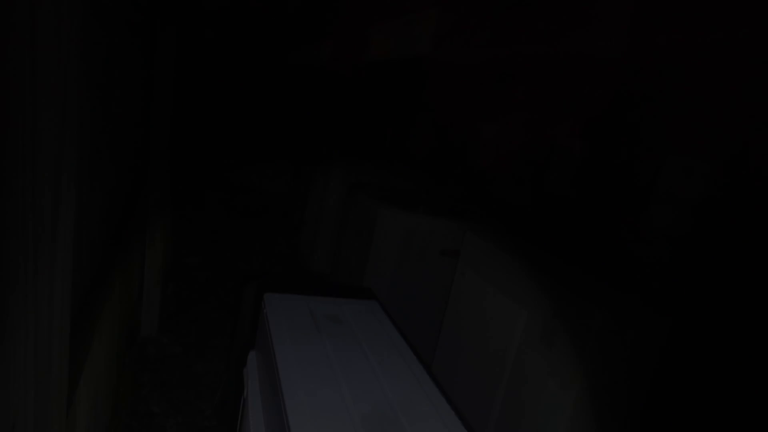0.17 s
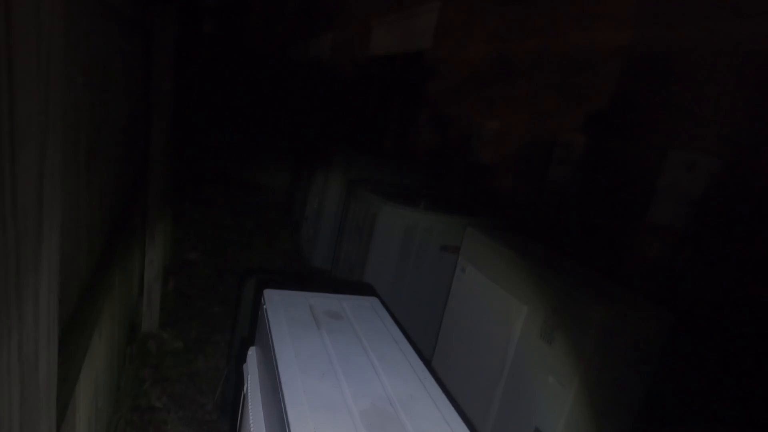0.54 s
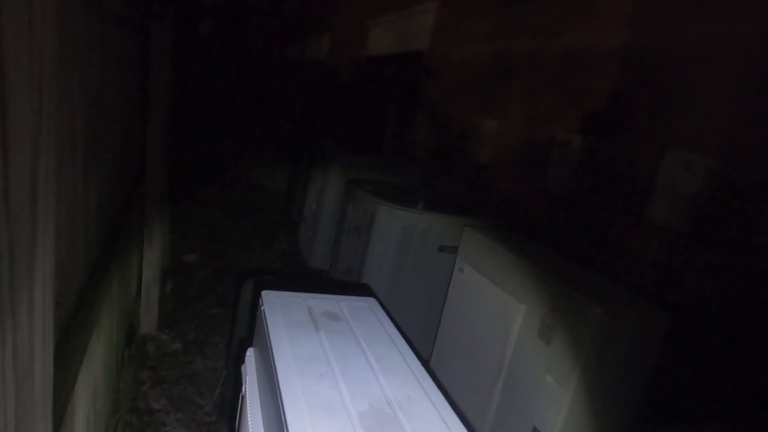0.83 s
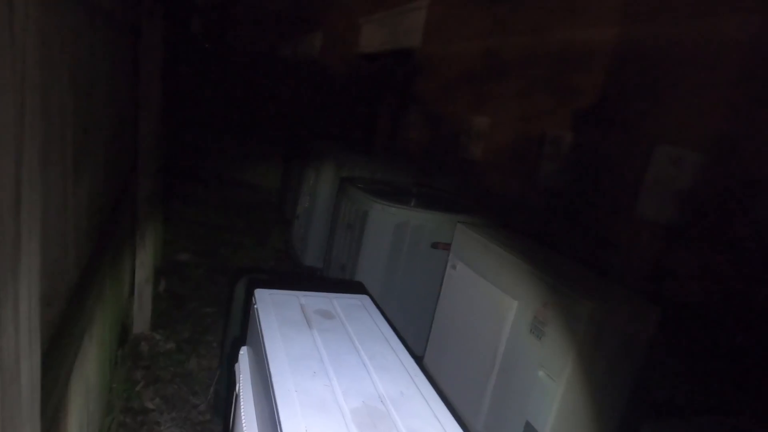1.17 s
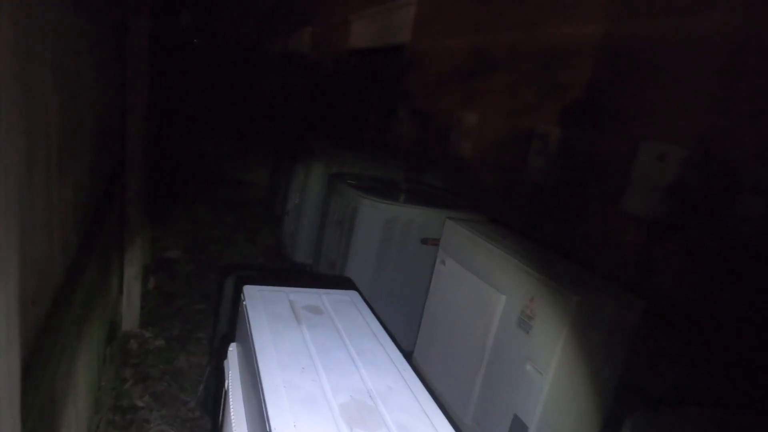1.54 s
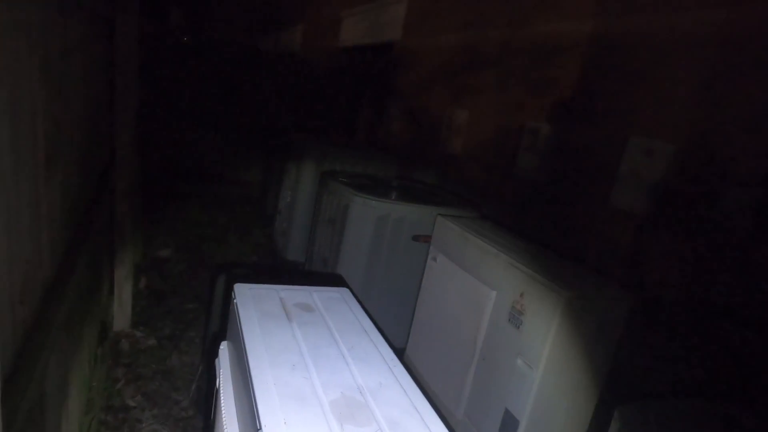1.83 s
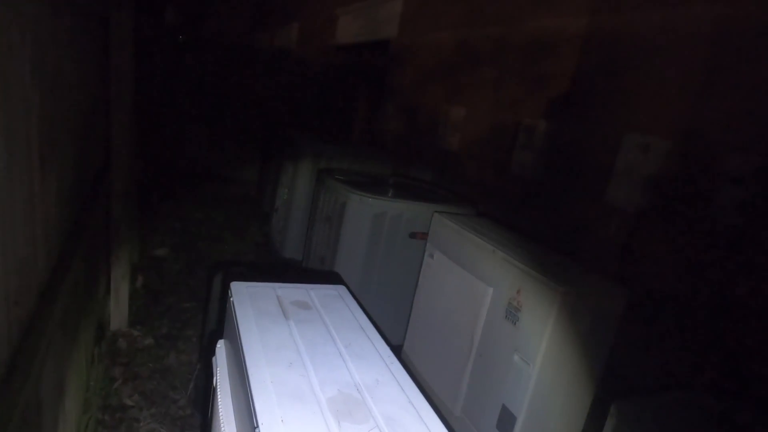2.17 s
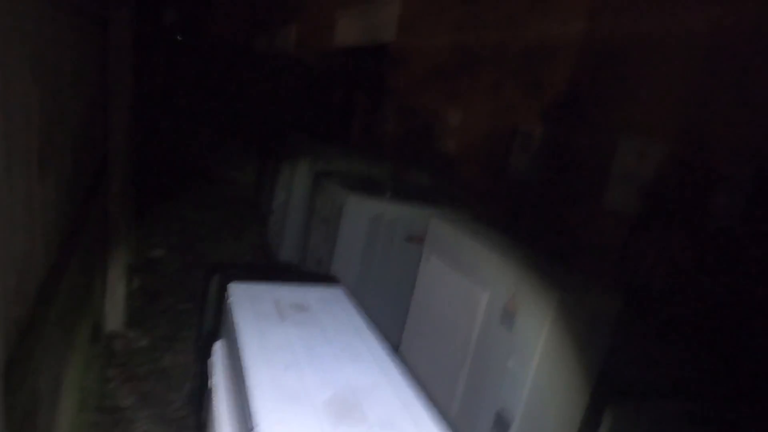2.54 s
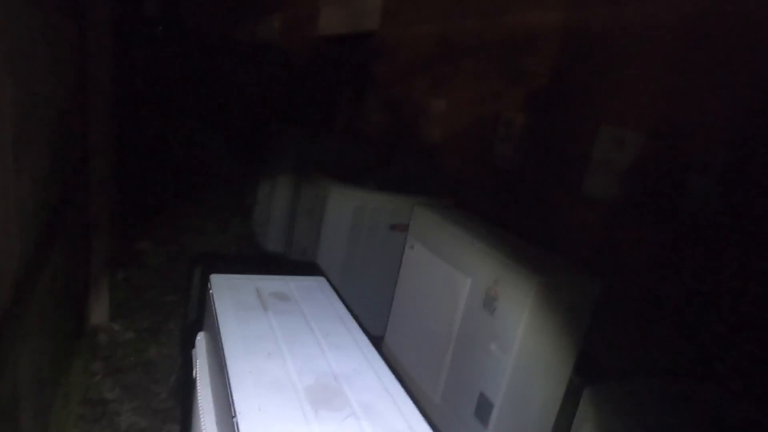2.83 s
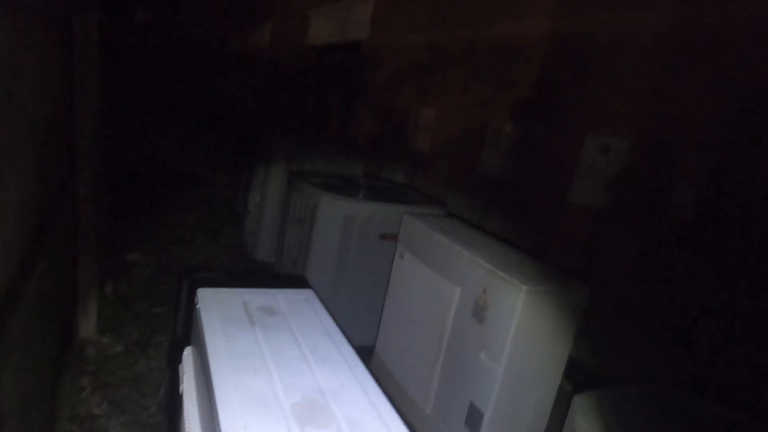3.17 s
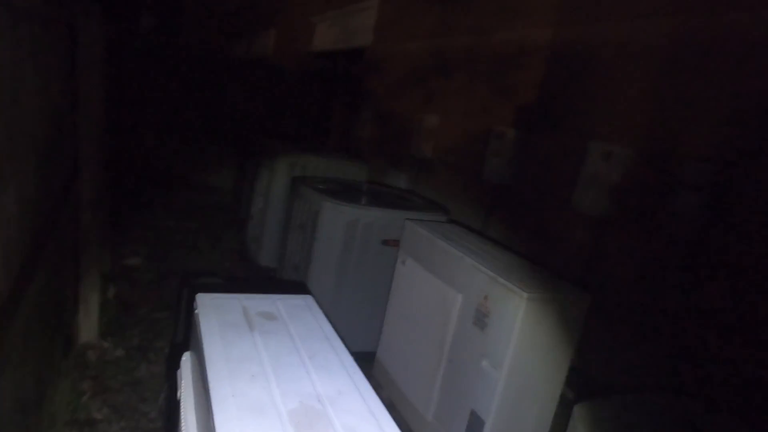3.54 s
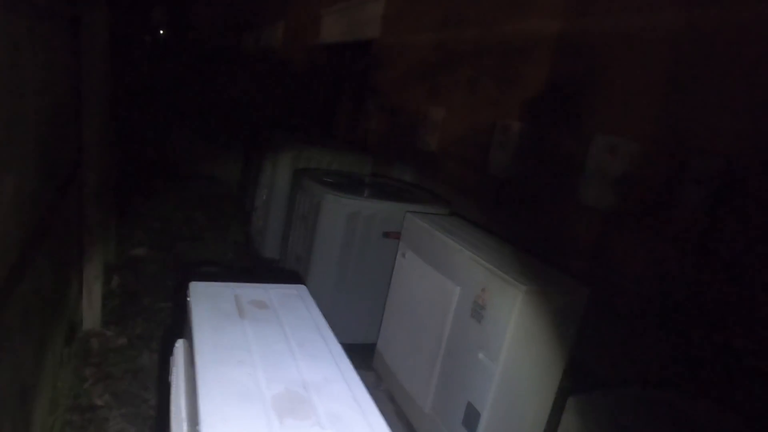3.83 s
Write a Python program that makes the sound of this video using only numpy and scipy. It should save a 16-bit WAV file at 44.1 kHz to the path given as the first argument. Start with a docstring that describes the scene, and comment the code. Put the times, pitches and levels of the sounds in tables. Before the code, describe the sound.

Air conditioning unit hums with rushing air at night until a neighbouring unit starts with a metallic clunk.

```python
"""Air conditioners at night

Outdoor units in a narrow side yard, fading in. A running unit drones: fan blade tones and compressor
whine throb about ten times a second, over rushing air (shaped noise) and a hum of two beating tones.
Soft low bumps and metal ticks are short bursts. At 2.3 s a second unit clunks on: noise clatter and
panel modes ring, low booms shudder on its mounts, and its compressor spins up and settles to a fine
buzz, made of a noise pattern repeated every turn."""
import sys
import numpy as np
from scipy import signal
from scipy.fft import rfft, irfft
from scipy.io import wavfile
from scipy.ndimage import uniform_filter1d

SR = 44100
rng = np.random.default_rng(int(sys.argv[2]) if len(sys.argv) > 2 else 0)


def transcribe(u):
    """Save the signal u as a 16-bit wav file named by the first command-line argument.

    u: samples, shape (n,) or (channels, n), limited to [-1, 1]; the rate is SR.
    q: integer samples, one column per channel.
    """
    v = np.clip(np.atleast_2d(u).T, -1, 1)
    q = np.round(v * 32767).astype(np.int16)
    wavfile.write(sys.argv[1], SR, q)


N = 176400

# Stereo noise: (frequency [Hz], left-right likeness [0-1])
LIKENESS = [(25, 0.55), (60, 1), (100, 0.96), (140, 1), (200, 1), (290, 1), (430, 0.95), (640, 0.6),
            (1100, 0.44), (1500, 0.43), (2000, 0.78), (3300, 0.63), (5000, .5), (7000, 0.38), (15000, .1)]
# (frequency [Hz], left over right [dB])
PAN = [(60, -2), (120, 0), (260, 0), (480, -2), (680, -13.5), (1000, -9.5), (1900, -5.5), (3800, -4),
       (7500, -3.5), (15000, 5)]
# (frequency [Hz], left lead [rad])
LEAD = [(100, 0.5), (350, -0.5), (540, -2), (700, 0), (1120, 1), (2000, 0.84), (2900, 0.33), (4300, -0.4),
        (6200, -1.85), (10000, -3.5)]

# Running unit
BLADE_HZ, PUMP_HZ, THROB_HZ = 42.78, 26.587, 9.92
THROB_AT_S, THROB_SHARP = 0.005, 0.1
PUMP_THROB, AIR_THROB, STROKE_DEPTH = 0.3, 0.38, 0.3
# Fan tones: (multiple of blade rate, base level [dB], left over right [dB], left lead [rad],
# throb depth, pitch sway [rad])
FAN_TONES = [(2, -49.5, 0, -0.26, .1, 0), (3, -50.5, -2, -0.087, .1, 0), (10, -56, -4.5, -0.57, .2, 0),
             (11, -54, -2.5, 0.59, .3, -.1), (12, -40.5, -2, -0.72, .56, -.35),
             (13, -35.4, -3.5, -0.81, .48, .14), (14, -47.5, -13, -0.96, .9, -.1),
             (15, -50.5, -8, -0.76, 1.1, -.7), (24, -51, -5.5, 0.8, .7, 0)]
# Sway of the hand-held microphone from the fan: (time [s], extra distance [m])
MIC_SWAY = [(0, -0.14), (1.5, -0.087), (1.75, 0.043), (2.05, -0.085), (2.4, -0.013), (2.85, -0.11),
            (3.1, -0.00055), (3.33, -0.045), (3.55, 0.19), (4, .15)]
SOUND_M_PER_S, FAN_WAVER_DB = 343, 0.7
# Compressor whine: (multiple of pump speed, base level [dB], left over right [dB], left lead [rad])
PUMP_TONES = [(5, -54.5, -0.5, -0.16), (24, -48, -3, -0.046), (25, -41.5, -5.5, 0.79),
              (26, -43.5, -12.5, -0.57), (27, -52, -10, -0.15), (28, -57, -6, 0.23), (31, -57, 5, 0.089),
              (44, -55, -8.5, 0.54)]
# Casing resonances stirred by air: (frequency [Hz], width [Hz], base level [dB])
CASING_MODES = [(575, 45, -43), (686, 49, -39.5)]
# Gain of whine and casing: (time [s], level [dB])
DRONE_LEVEL = [(.8, -1), (2, -2), (3.1, 0), (3.4, -1), (3.7, 1.5)]

HUM_HZ, BEAT_HZ, BEAT_AT_S, BEAT_DEPTH = 59.9, 2.86, 1.738, 0.85
# Hum level before beating: (time [s], level [dB])
HUM_LEVEL = [(0, -38), (1.2, -48.5), (1.7, -41), (2.1, -41.5), (2.45, -44.5), (2.8, -41), (3.15, -48.5),
             (3.5, -42), (4, -46)]

# Rushing air spectrum: (frequency [Hz], relative density [dB per Hz])
AIR_SPECTRUM = [(20, -13), (45, -7), (65, -4), (100, -2), (135, -3.5), (170, -1.5), (240, -4), (330, -10.5),
                (480, -6), (780, -9), (1000, -5.5), (1170, -4), (1350, -14), (1800, -13.5), (2150, -23),
                (3600, -26.5), (4100, -30), (5200, -30.5), (7000, -35.5), (9500, -41), (11500, -59.5),
                (15000, -66)]
# Grille resonances: (frequency [Hz], level [dB])
GRILLE_MODES = [(1464, -55), (1723, -59.5), (1976, -60.5), (2762, -67), (2880, -69.5), (2945, -70),
                (3801, -72.5), (3946, -76.5)]
# Deep rumble: (time [s], level [dB])
RUMBLE_LEVEL = [(0, -59), (2.599, -58.5), (2.82, -41), (3.05, -58), (3.33, -47), (3.5, -32), (3.66, -53),
                (3.85, -36), (4, -54)]
# Deep rumble: (frequency [Hz], left-right likeness [0-1])
RUMBLE_LIKENESS = [(20, .2), (200, .3)]
# Whistle swell: (time [s], gain [dB])
WHISTLE_SWELL = [(0.2, 1), (0.55, 7), (0.9, 5), (1.4, -0.5), (2.3, 0), (2.8, 3)]
AIR_DB, BUFFET_DB, WHISTLE_DB = -33.5, -52.5, -64.5
GRILLE_WIDTH_HZ, WHISTLE_HZ, WHISTLE_WIDTH_HZ = 22, 3487, 75

# Low bumps: (centre time [s], frequency [Hz], peak level [dB])
LOW_BUMPS = [(.82, 123.7, -34), (1.15, 107, -34), (1.385, 62, -34), (2.14, 88, -34), (2.67, 86.3, -36),
             (2.95, 78.7, -35), (3.82, 90, -32.5)]
BUMP_S = 0.026  # centre to 1/e
# Casing ticks: (time [s], frequency [Hz], level [dB])
CASING_TICKS = [(1.008, 3520, -44), (2.637, 5000, -46), (2.692, 4900, -42.5), (3.228, 3400, -45)]

# Clunk blows: (time [s], relative level [dB], treble tilt [dB per octave])
CLUNK_BLOWS = [(2.320, -17, 1.5), (2.3402, -4, 4), (2.3438, -1, 4), (2.349, -2, 1), (2.360, -1.5, -6),
               (2.365, -2.5, -6.5), (2.375, -8.5, 0), (2.384, -11.5, -2)]
# Cabinet clatter: (frequency [Hz], relative density [dB per Hz], t60 [s])
CLATTER_BANDS = [(150, -15, 0.33), (500, -2.5, 0.18), (960, 5, 0.16), (1380, 2.5, 0.22), (2200, -4.5, 0.22),
                 (3430, -2, 0.18), (4600, -9, 0.19), (5800, -1.5, 0.071), (7570, -19.5, 0.29),
                 (9800, -23, 0.18), (11900, -40, 0.24), (15500, -44, .15)]
# Sheet metal modes: (frequency [Hz], relative level [dB], t60 [s])
PANEL_MODES = [(920, 5, 0.12), (1054, 7, 0.22), (1285, 6, 0.18), (2369, -1, 0.16), (2910, 2, .13),
               (3800, 2, 0.11), (5300, -2, .1)]
# Clunk stereo: (frequency [Hz], left-right likeness [0-1])
CLUNK_LIKENESS = [(150, 1), (400, 0.73), (950, 0.61), (2400, 0.69), (6000, 0.45), (15000, .1)]
# (frequency [Hz], left over right [dB])
CLUNK_PAN = [(60, 3), (150, 2), (380, 2), (950, -4.5), (2380, -1), (5980, -1), (15000, 1)]
# (frequency [Hz], left lead [rad])
CLUNK_LEADS = [(100, 0), (6400, 0), (9000, -1.6)]
CLATTER_DB, PANEL_DB, BLOW_RISE_S = -24.8, -41.5, 0.001
CRACK_DB, CRACK_S = -10, 0.009  # extra edge, relative to the clatter
CHATTER_DB, CHATTER_HZ = 2.2, 260

# Starting compressor; MOTOR_HZ is its settled speed
START_S, MOTOR_HZ, SPIN_UP_S = 2.345, 59.04, 0.05
# Strong partials: (multiple of motor speed, base level [dB], left over right [dB], left lead [rad])
MOTOR_TONES = [(2, -57.5, -2.5, 0), (3, -45.5, -0.5, 0), (4, -50, 1, 0.067), (5, -50.5, 0.5, 0.13),
               (7, -48.5, -3, 0), (16, -53.5, -2, 0.55), (25, -57, -2, 0.21), (26, -49, -4, 0.66),
               (29, -60, -3, 0.24), (30, -59.5, -7, .3), (51, -61, 1, .3)]
# Buzz spectrum: (frequency [Hz], relative density [dB per Hz])
BUZZ_SPECTRUM = [(900, -9.5), (1700, 7), (2100, -4.5), (3000, -0.5), (3900, -8), (4700, -7), (5700, -10),
                 (6400, -8), (8000, -15), (9800, -21), (11500, -50), (15000, -42)]
BUZZ_DB, STRAIN_DB, SETTLE_S, EASE_DB_PER_S = -46, 7.5, 0.22, 2
BUZZ_ROUGH = 0.08  # power share of plain noise

# Heave of the cabinet as the motor takes load
HEAVE_HZ, HEAVE_WIDTH_HZ, HEAVE_DB, HEAVE_RISE_S, HEAVE_S = 210, 210, -31, 0.03, 0.26
# Shudders on the mounts: (time [s], frequency [Hz], level [dB], t60 [s])
MOUNT_SHUDDERS = [(2.352, 182, -23, 0.2), (2.458, 153, -24, .2), (2.48, 248, -30, 0.6),
                  (2.55, 200, -34, .4), (2.72, 177, -28, 0.42)]

EDGE_HZ = 15300


def amp(db):
    """Decibels to gain."""
    return 10 ** (np.asarray(db) / 20)


def unit(x):
    """Scales to rms 1."""
    return x / np.sqrt(np.mean(x ** 2) + 1e-20)


def clock():
    """Time of every sample [s]."""
    return np.arange(N) / SR


def bins():
    """Frequency of every bin [Hz]."""
    return np.fft.rfftfreq(N, 1 / SR)


def read(points, hz, column=1):
    """Interpolates a table on a log-frequency axis."""
    rows = np.array(points)
    return np.interp(np.log(hz + 1), np.log(rows[:, 0]), rows[:, column])


def contour(points):
    """Interpolates a (time, value) table at every sample."""
    return np.interp(clock(), *np.transpose(points))


def add(mix, start_s, sound):
    """Mixes a sound in at a time, cut at the end."""
    part = mix[:, round(start_s * SR):][:, :sound.shape[-1]]
    part += sound[..., :part.shape[1]]


def decay(t, t60_s):
    """Exponential fall of 60 dB in t60."""
    return np.exp(-np.log(1000) * t / t60_s)


def drift(hz):
    """Slowed noise of rms 1; higher hz wanders faster."""
    return unit(irfft(rfft(rng.standard_normal(N)) / (1 + (bins() / hz) ** 2), N))


def noise(gain, likeness=LIKENESS, pan=PAN, lead=LEAD):
    """Coloured stereo noise of rms 1 with likeness, level and phase set between two ports."""
    hz = bins()
    left, other = rfft(rng.standard_normal((2, N)))
    same = np.clip(read(likeness, hz), 0, 1)
    side = amp(read(pan, hz) / 2)
    right = same * left + np.sqrt(1 - same ** 2) * other
    right = right * np.exp(-1j * read(lead, hz))
    return unit(irfft(np.array([left * side, right / side]) * gain, N))


def peak(hz, width_hz):
    """Resonance gain, half amplitude at half the width from centre."""
    return 1 / (1 + (2 * (bins() - hz) / width_hz) ** 2)


def throb(depth):
    """Regular swelling of the drone: round crests, narrow dips."""
    angle = 2 * np.pi * THROB_HZ * (clock() - THROB_AT_S)
    return 1 + depth * (np.cos(angle) - THROB_SHARP * np.cos(2 * angle))


def ports(z, db, pan_db, lead_rad):
    """A complex tone as two microphone ports hear it."""
    left = amp(pan_db / 2) * (z * np.exp(1j * lead_rad)).real
    right = amp(-pan_db / 2) * z.real
    return np.sqrt(2) * amp(db) * np.array([left, right])


def partials(rows, turns, waver, waver_hz, scatter_turns):
    """Wavering multiples of a rotation: in step they join into pulses; scatter loosens them."""
    out = np.zeros((2, N))
    for k, db, pan_db, lead_rad in rows:
        z = np.exp(2j * np.pi * (k * turns + scatter_turns * rng.random()))
        wander = 1 + waver * (drift(waver_hz) + 1j * drift(waver_hz))
        out += ports(z * wander, db, pan_db, lead_rad)
    return out


def fan():
    """Blade tones swell and bend with each throb; odd multiples sit a quarter cycle ahead."""
    t, out = clock(), np.zeros((2, N))
    distance_m = uniform_filter1d(contour(MIC_SWAY), size=4410)  # 0.1 s smoothing
    turns = BLADE_HZ * (t - distance_m / SOUND_M_PER_S)
    bend = np.sin(2 * np.pi * THROB_HZ * (t - THROB_AT_S))
    for k, db, pan_db, lead_rad, depth, sway_rad in FAN_TONES:
        z = np.exp(2j * np.pi * k * turns) * 1j ** (k % 2)
        z = z * (throb(depth) + 1j * sway_rad * bend)
        out += ports(z, db + FAN_WAVER_DB * drift(2.7), pan_db, lead_rad)
    return out * amp(np.interp(t, [1, 3.7], [-0.6, 1]))


def drone():
    """Compressor whine and casing noise throb with the fan; the casing flutters with each stroke."""
    t = clock()
    pump = partials(PUMP_TONES, PUMP_HZ * t, waver=0.39, waver_hz=3.6, scatter_turns=0.21)
    pump = pump * throb(PUMP_THROB)
    stroke = 1 + STROKE_DEPTH * np.cos(2 * np.pi * PUMP_HZ * t)
    casing = sum(amp(db) * noise(peak(hz, width_hz)) for hz, width_hz, db in CASING_MODES)
    casing = casing * throb(AIR_THROB) * stroke
    return (pump + casing) * amp(contour(DRONE_LEVEL))


def hum():
    """Mains hum beats slowly against a motor running just below it."""
    t, start = clock() - BEAT_AT_S, rng.random()
    mains = np.cos(2 * np.pi * (HUM_HZ * t + start))
    motor = np.cos(2 * np.pi * ((HUM_HZ - BEAT_HZ) * t + start))
    return np.sqrt(2) * amp(contour(HUM_LEVEL)) * (mains + BEAT_DEPTH * motor)


def air():
    """Turbulent air sings in the grille, with a thin whistle, lumpy low buffeting and deep rumble."""
    rush = amp(AIR_DB + 0.9 * drift(23)) * noise(amp(read(AIR_SPECTRUM, bins()))) * throb(0.019)
    grille = sum(amp(db) * noise(peak(hz, GRILLE_WIDTH_HZ)) for hz, db in GRILLE_MODES)
    whistle_db = WHISTLE_DB + 1.7 * drift(17) + contour(WHISTLE_SWELL)
    whistle = amp(whistle_db) * noise(peak(WHISTLE_HZ, WHISTLE_WIDTH_HZ))
    buffet = amp(BUFFET_DB + 2.5 * drift(6.7)) * noise(peak(105, 70))
    rumble = amp(contour(RUMBLE_LEVEL)) * noise(peak(57, 70), RUMBLE_LIKENESS)
    return rush + grille + whistle + buffet + rumble


def bumps():
    """Dull low sines swell and fade within a few cycles."""
    t, out = clock(), np.zeros(N)
    for centre_s, hz, db in LOW_BUMPS:
        swell = np.exp(-((t - centre_s) / BUMP_S) ** 2)
        out += amp(db) * swell * np.sin(2 * np.pi * (hz * t + rng.random()))
    return out


def ticks():
    """Loose metal ticks: short bursts of resonant noise."""
    out, t = np.zeros((2, N)), clock()
    envelope = np.minimum(t / 0.00089, 1) * np.exp(-t / 0.01)
    for start_s, hz, db in CASING_TICKS:
        colour = peak(hz, 250) + 0.18 * peak(hz, 6000) ** 2
        add(out, start_s, amp(db) * noise(colour) * envelope)
    return out


def clunk():
    """Quick blows crack through the cabinet, ring its panels and scatter between the walls."""
    out, t = np.zeros((2, N)), clock()[:SR // 2]
    for start_s, db, tilt_db in CLUNK_BLOWS:
        source = noise(1, CLUNK_LIKENESS, CLUNK_PAN, CLUNK_LEADS)[:, :len(t)]
        hz, age_s, z = signal.stft(source, SR, nperseg=256)
        octaves = np.log2(np.clip(hz, 800, 7000) / 3000)
        colour = unit(amp(read(CLATTER_BANDS, hz) + tilt_db * octaves))
        fall = amp(-60 * age_s / read(CLATTER_BANDS, hz, column=2)[:, None])
        clatter = signal.istft(z * colour[:, None] * fall, SR, nperseg=256)[1][:, :len(t)]
        crack = 1 + amp(CRACK_DB) * np.exp(-t / CRACK_S)
        clatter = clatter * crack * amp(CHATTER_DB * drift(CHATTER_HZ)[:len(t)])
        ring = np.zeros((2, len(t)))
        for mode_hz, mode_db, t60_s in PANEL_MODES:
            start_turns = rng.random() + 0.35 * rng.random((2, 1))  # sides loosely in phase
            tone = np.sin(2 * np.pi * (mode_hz * t + start_turns))
            ring += amp(mode_db) * decay(t, t60_s) * tone
        blow = amp(CLATTER_DB) * clatter + amp(PANEL_DB) * ring
        add(out, start_s, amp(db) * np.minimum(t / BLOW_RISE_S, 1) * blow)
    return out * amp([[-0.5], [0.5]])


def compressor():
    """The second motor spins up, strains, and settles to a buzz of many harmonics."""
    age_s = np.maximum(clock() - START_S, 0)
    turns = np.cumsum(MOTOR_HZ * (1 - np.exp(-age_s / SPIN_UP_S))) / SR
    on = 1 - np.exp(-age_s / 0.037)
    colour = amp(read(BUZZ_SPECTRUM, bins()))
    # One noise pattern per side, replayed every turn with slight timing jitter
    size = 4096
    shared, apart = rng.standard_normal((2, size))
    rattle = []
    for cycle in (shared, shared + 0.3 * apart):
        place = (turns + 0.000476 * drift(4.2)) % 1
        rattle.append(np.interp(place, np.arange(size) / size, cycle))
    regular = unit(irfft(rfft(np.array(rattle)) * colour, N))
    buzz = np.sqrt(1 - BUZZ_ROUGH) * regular + np.sqrt(BUZZ_ROUGH) * noise(colour)
    level_db = BUZZ_DB + STRAIN_DB * np.exp(-age_s / SETTLE_S) - EASE_DB_PER_S * age_s
    buzz = buzz * amp(level_db) * amp([[-1], [1]])
    tones = partials(MOTOR_TONES, turns, waver=0.34, waver_hz=3.9, scatter_turns=1)
    return on * (buzz + tones)


def shudder():
    """The motor's kick heaves the cabinet and rocks it on its mounts in low, short booms."""
    out, t = np.zeros((2, N)), clock()
    heave = amp(HEAVE_DB) * noise(peak(HEAVE_HZ, HEAVE_WIDTH_HZ) ** 1.04)
    add(out, START_S, heave * np.minimum(t / HEAVE_RISE_S, 1) * np.exp(-t / HEAVE_S))
    for start_s, hz, db, t60_s in MOUNT_SHUDDERS:
        envelope = np.minimum(t / 0.016, 1) * decay(t, t60_s)
        boom = np.sin(2 * np.pi * (hz * t + rng.random()))
        add(out, start_s, amp(db) * envelope * boom)
    return out


def scene():
    """The running unit, then the second one starting beside it."""
    running = fan() + drone() + hum() + air() + bumps() + ticks()
    starting = clunk() + compressor() + shudder()
    return running + starting


def record(dry):
    """A fade-in, then the band limit."""
    fade = np.clip((clock() - 0.085) / 0.77, 1e-6, 1) ** 1.73
    lowpass = signal.firwin(511, EDGE_HZ, window=("kaiser", 9), fs=SR)
    return signal.oaconvolve(dry * fade, lowpass[None], "same", axes=1)


dry = scene()
out = record(dry)
transcribe(out)
```